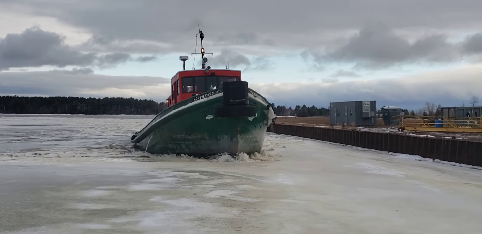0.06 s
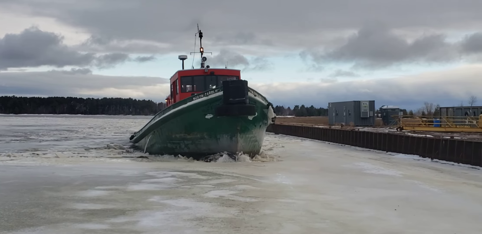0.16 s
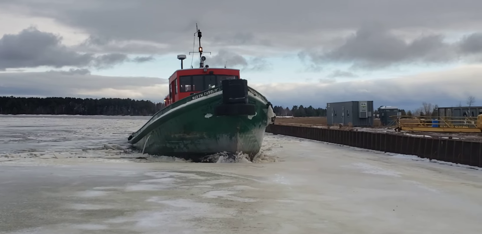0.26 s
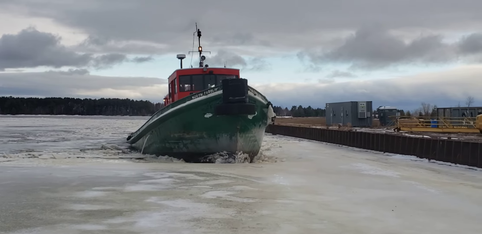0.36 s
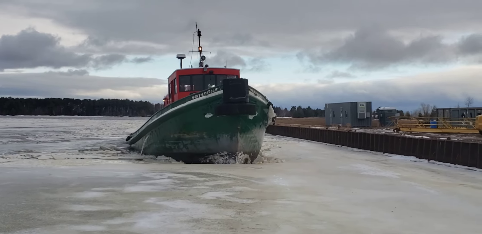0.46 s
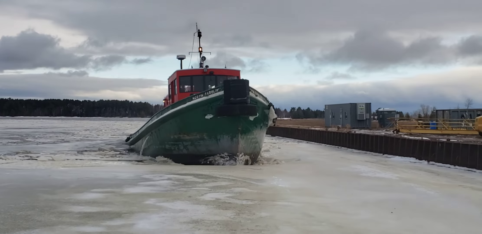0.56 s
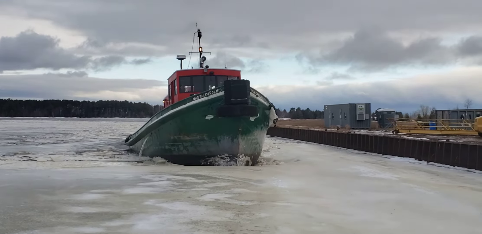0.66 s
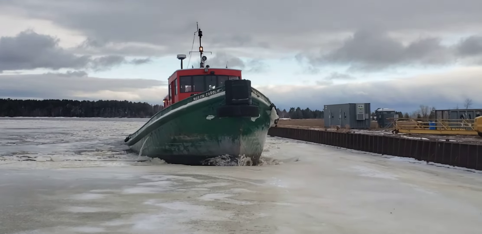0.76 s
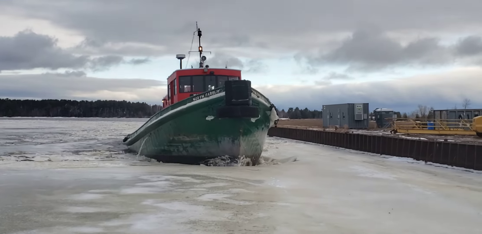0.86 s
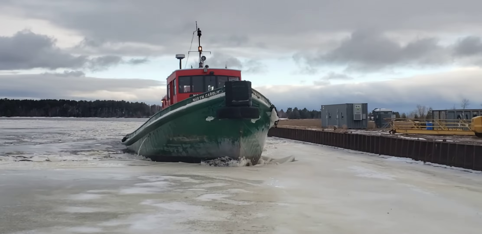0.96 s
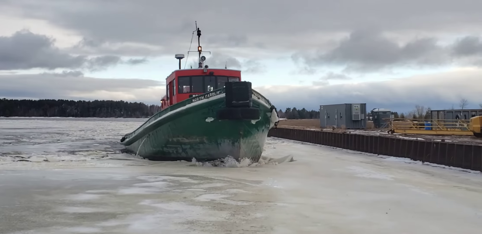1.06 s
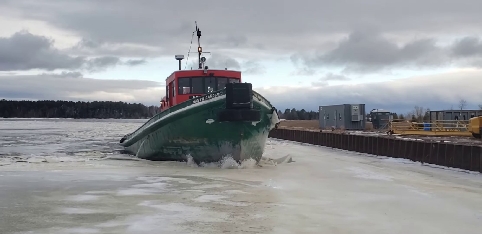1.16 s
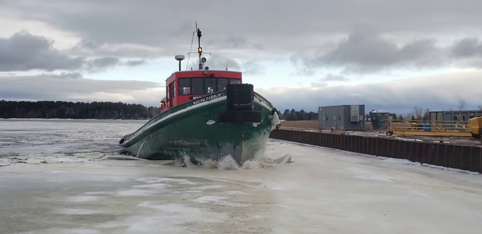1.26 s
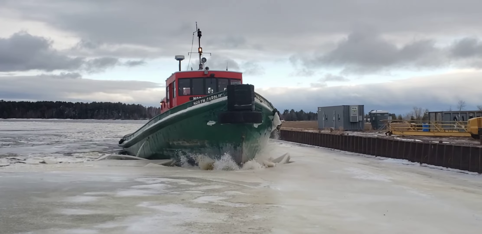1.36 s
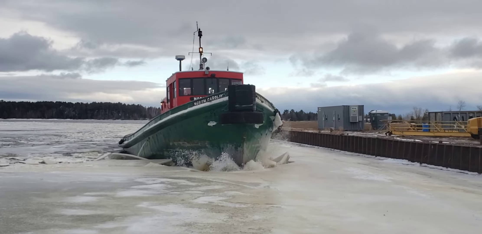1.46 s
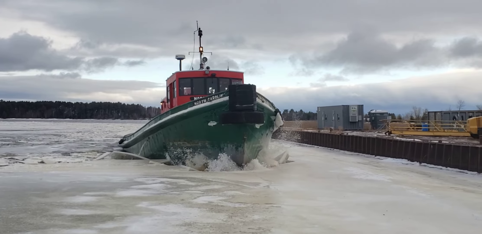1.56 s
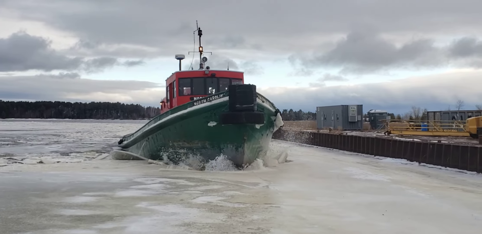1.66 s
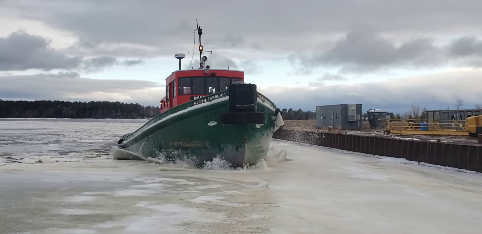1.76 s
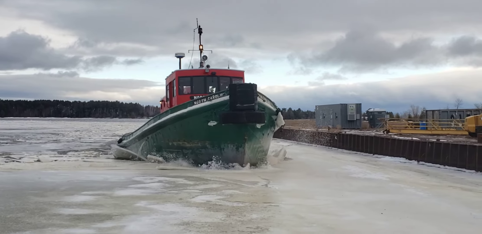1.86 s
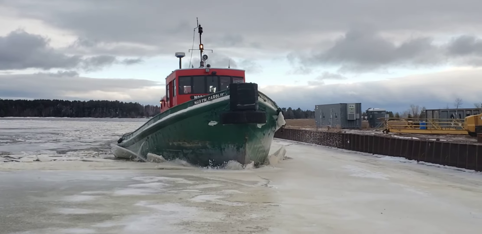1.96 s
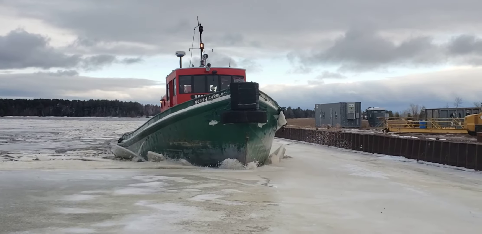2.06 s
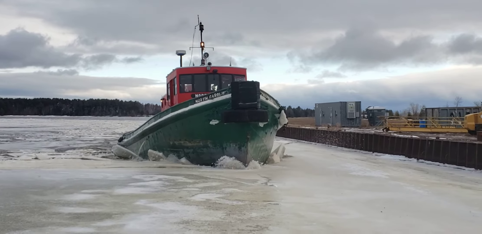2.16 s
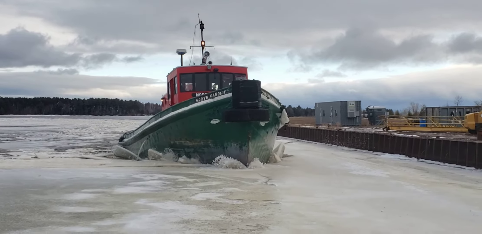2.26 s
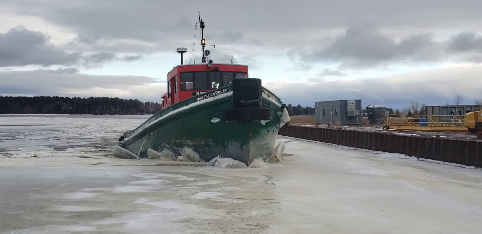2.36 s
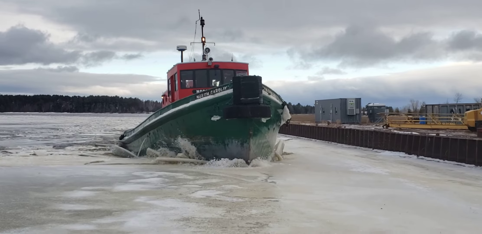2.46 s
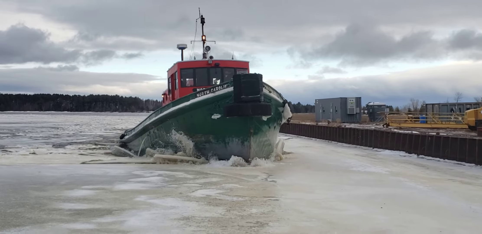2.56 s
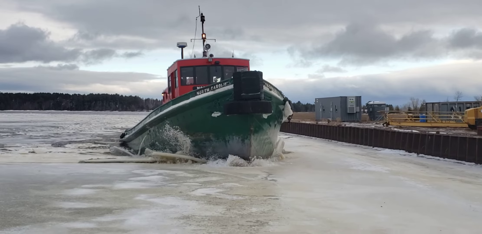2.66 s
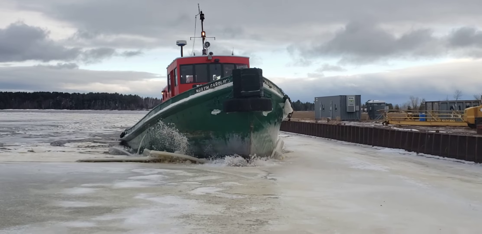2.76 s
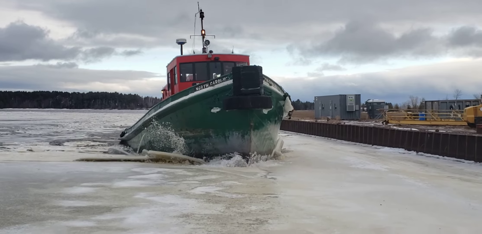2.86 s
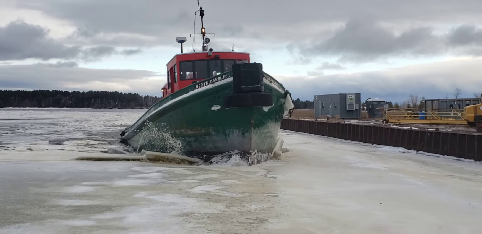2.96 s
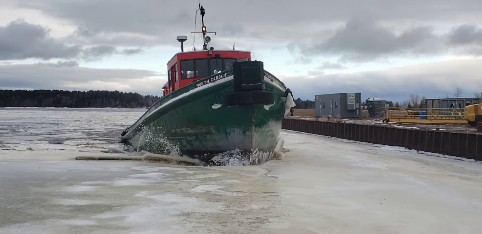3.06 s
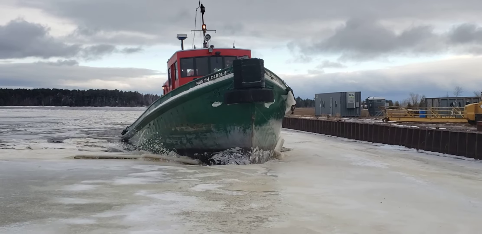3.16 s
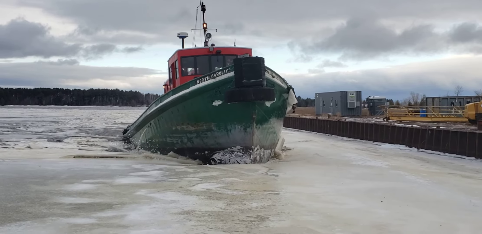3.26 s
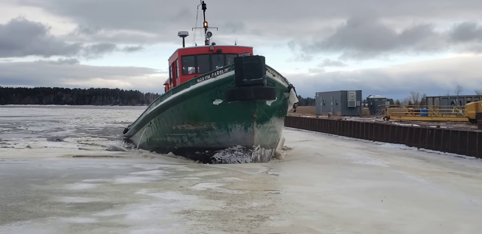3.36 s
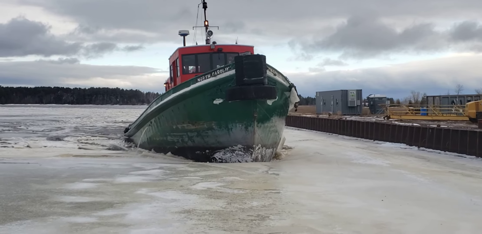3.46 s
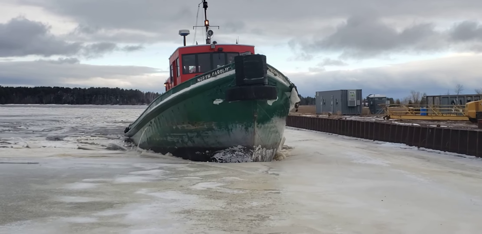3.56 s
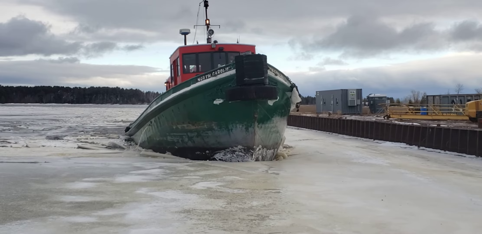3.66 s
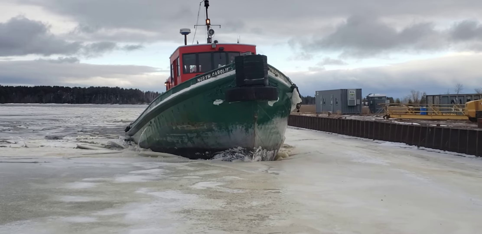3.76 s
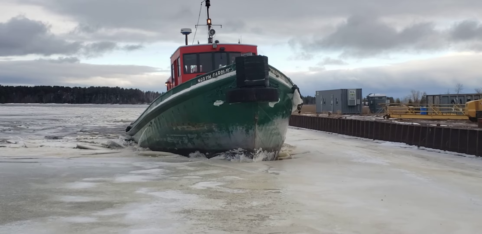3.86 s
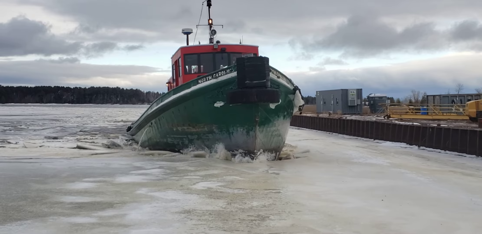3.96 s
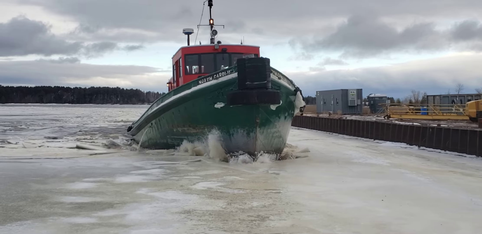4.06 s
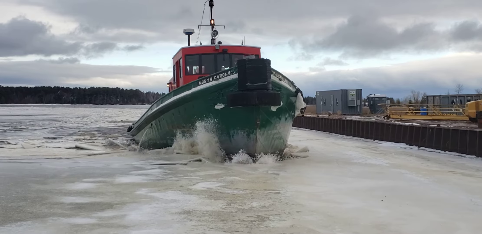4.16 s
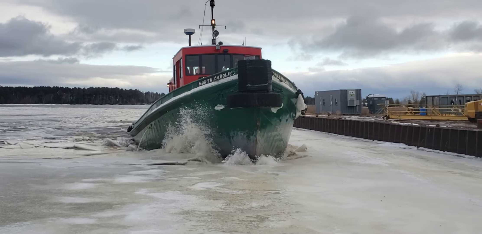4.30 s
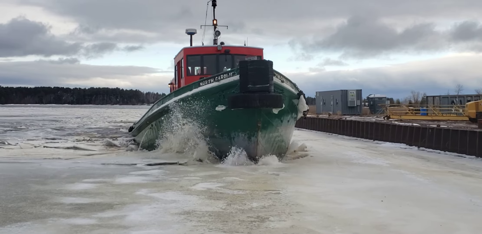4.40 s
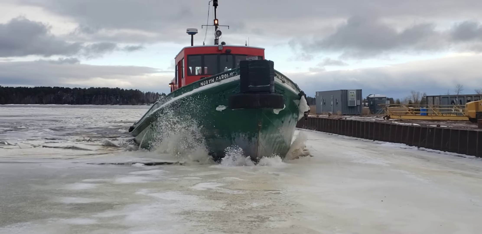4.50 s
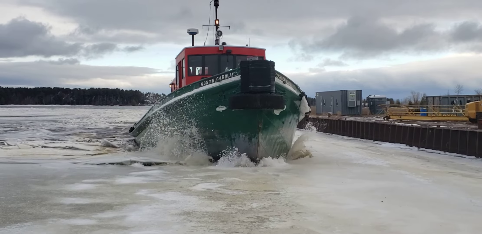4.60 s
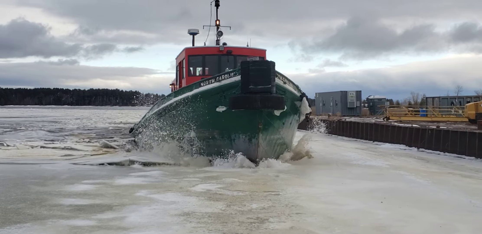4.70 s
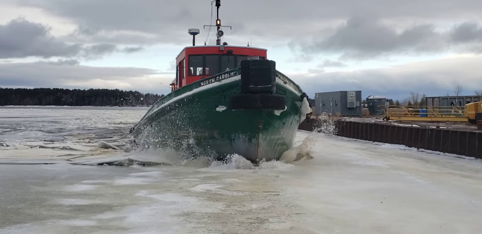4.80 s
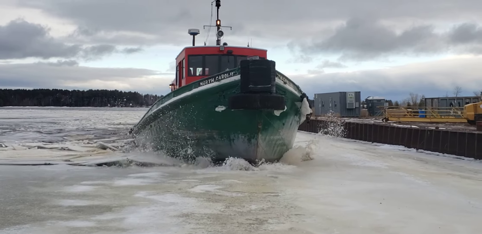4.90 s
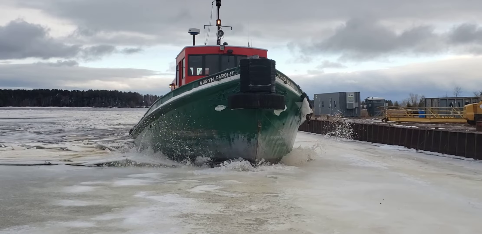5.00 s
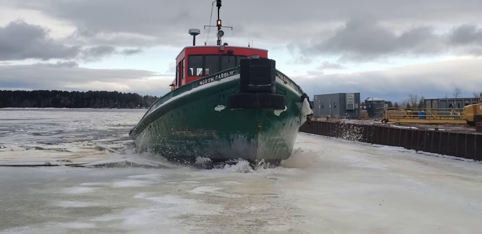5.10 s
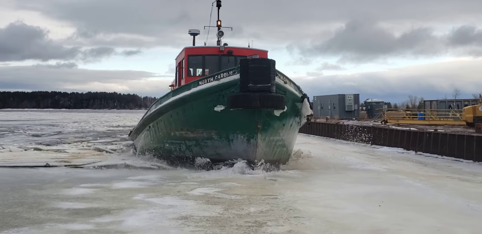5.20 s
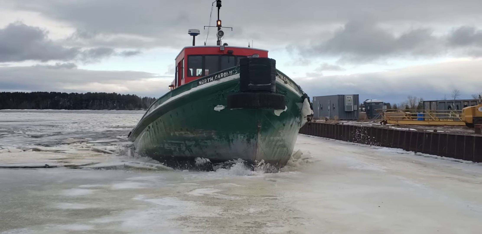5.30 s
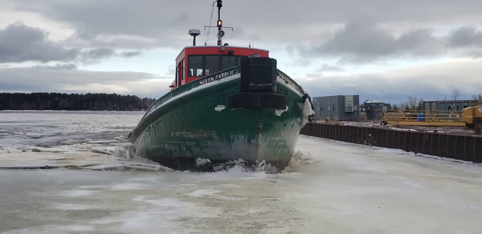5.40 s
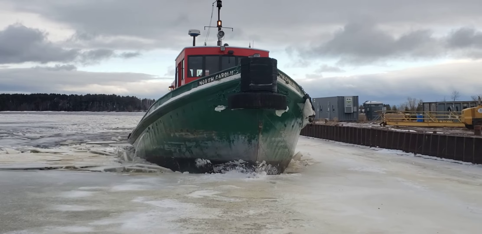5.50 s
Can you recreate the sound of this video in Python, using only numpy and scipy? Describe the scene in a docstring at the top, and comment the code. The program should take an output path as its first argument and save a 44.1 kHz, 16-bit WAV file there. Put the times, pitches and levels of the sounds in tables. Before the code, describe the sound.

A tugboat works through thin harbour ice, heard from shore in wide stereo, with light wind rumbling on the microphone and a dull echo from quay and far shore. A low diesel hum of about 70 hertz runs throughout, with dull chugs around eleven per second. It starts mid-surge: low crushing, hull rumble and a short floe groan, sinking by 0.5 s. Small bright snaps tick until about 1.2 s, when a strong surge hits with hard crunches, grinding and groans. Another from 2.0 to 2.7 s adds heavy low thumps, then big gulps of air at 2.75 and 2.9 s. Around 3.3 s ice eases; chugs stand out, a plate slides with a crackling rasp, and spray hisses briefly at 3.6 s. Crushing rebuilds from 3.9 s, strong at 4.2 to 4.8 s with groans, thumps and a gurgle. The last surge, 5.05 to 5.5 s, has sharp crunches, bright snaps and tinkling crumbs.

```python
"""A tugboat pushes through thin harbour ice, heard from the shore.
It opens in mid-surge: the bow crushes and grinds ice made of random clicks with short, hard peaks, the hull rumbles,
air gurgles, slush and spray fizz, floes groan as ringing slips, a diesel of sines and noise hums in a breeze.
Low thumps are decaying swings; from half a second bright bursts snap and crumbs tick, and surges come with crunches.
Around 3.3 s the ice eases, the diesel chugs stand out and plates slide; two more surges close the scene."""
import sys
import numpy as np
from scipy import signal
from scipy.fft import rfft, irfft, next_fast_len
from scipy.io import wavfile

SR = 44100
rng = np.random.default_rng(int(sys.argv[2]) if len(sys.argv) > 2 else 0)


def put_to_file(sound):
    """Save the sound as 16-bit audio at rate SR, in the file named by the first command-line argument."""
    columns = np.atleast_2d(sound).T  # one column per channel
    safe = np.clip(columns, -1, 1)
    whole_steps = np.round(safe * 32767)
    wavfile.write(sys.argv[1], SR, whole_steps.astype(np.int16))


N = 244314   # length in samples


def from_db(db):
    """Decibels to gain."""
    return 10 ** (np.asarray(db) / 20)


def rms_one(x):
    """Scale to rms 1."""
    return x / np.sqrt(np.mean(x ** 2) + 1e-20)


def together(levels_db):
    """Level in dB of unrelated sounds heard at once: their powers add."""
    return 10 * np.log10(sum(from_db(db) ** 2 for db in levels_db))


def in_time(rows):
    """Each column of a curve, sample by sample."""
    s, *columns = np.transpose(rows)
    return [np.interp(np.arange(N) / SR, s, column) for column in columns]


def per_bin(points):
    """A table over log frequency, read at every spectrum bin."""
    hz, value = np.transpose(points)
    bin_hz = np.fft.rfftfreq(next_fast_len(N), 1 / SR)
    return np.interp(np.log(bin_hz + 1), np.log(hz), value)


def drift(rate):
    """Smoothed noise of rms 1: a higher rate wavers faster."""
    step = 40   # computed at every 40th sample
    r = np.exp(-2 * np.pi * rate * step / SR)
    noise = rng.standard_normal(N // step + 2002)
    slow = signal.lfilter([1], [1, -2 * r, r * r], noise)[2000:]   # skip the filter's settling
    return np.interp(np.arange(N) / step, np.arange(len(slow)), rms_one(slow))


def swell(start, hold_s, rise_s, fall_s, edge_db, sag_db_per_s=0):
    """Level in dB of a swell that climbs to full force at start, sags while it holds, and dies away."""
    t = np.arange(N) / SR - start
    outside = np.maximum(-t, 0) / rise_s + np.maximum(t - hold_s, 0) / fall_s
    return -edge_db * outside - sag_db_per_s * np.clip(t, 0, hold_s)


LUMP_HALF_WIDTH_S = 0.053   # from the centre to 6 dB down


def lump(s):
    """Level in dB of a brief, rounded swell centred on time s."""
    return -20 * np.log10(1 + ((np.arange(N) / SR - s) / LUMP_HALF_WIDTH_S) ** 2)


def band(x, low_hz, high_hz):
    """Causal band-pass."""
    sos = signal.butter(2, [low_hz, min(high_hz, .45 * SR)], "band", fs=SR, output="sos")
    return signal.sosfilt(sos, x + 1e-18)


def resonances(x, rows):
    """A chain of peaks and notches."""
    for hz, width, db in rows:
        a, c, g = np.pi * width / SR, -2 * np.cos(2 * np.pi * hz / SR), from_db(db / 2)
        x = signal.lfilter([1 + a * g, c, 1 - a * g], [1 + a / g, c, 1 - a / g], x)
    return x


def pan(left_db):
    """Gains of the two channels; left_db is how much louder the left is."""
    return from_db(np.array([[left_db], [-left_db]]) / 2)


def add(out, s, sound):
    """Mix a short sound in at time s."""
    at = int(np.clip(round(s * SR), 0, N - 1))
    out[..., at:at + sound.shape[-1]] += sound[..., :N - at]


def thud(t, hz, rise_cycles):
    """A soft blow: a swing that builds for part of a cycle and dies within a few."""
    age = t * hz / rise_cycles
    return age * np.exp(1 - age) * np.sin(2 * np.pi * hz * t)


def grains(per_s, spread_db):
    """Two unrelated trains of random clicks: many small, a few large."""
    born = rng.random((2, N)) < per_s / SR
    count, clicks = born.sum(), np.zeros((2, N))
    size_db = spread_db * np.minimum(rng.exponential(1, count), 4)
    clicks[born] = from_db(size_db) * rng.choice([-1, 1], count)
    return clicks / np.sqrt(per_s)


def fractures(low_hz, high_hz, per_s, patchy_db, count):
    """Pieces of each size break in clumps of their own, so the pitch of the crunch keeps shifting."""
    edges = np.geomspace(low_hz, high_hz, count + 1)
    trains = [grains(per_s, spread_db=1.5), grains(per_s, spread_db=2.0)]
    total = 0
    for k in range(count):
        pieces = band(trains[k % 2], edges[k], edges[k + 1])
        total = total + pieces * from_db(patchy_db * drift(22.6))
    return total


# How alike left and right are. Each row: frequency in Hz, correlation.
STEREO_LIKENESS = [(50, 0.66), (130, 0.97), (280, 0.94), (550, 0.96), (1100, 0.87), (2000, 0.97),
                   (4000, 0.69), (8000, 0.14), (16000, .1)]


def radiate(pair, spectrum):
    """Colour two excitations and mix them to stereo, mostly alike up to the mids and wide on top; rms 1."""
    size = next_fast_len(N)
    mid, side = rfft(pair, size) * from_db(per_bin(spectrum))
    alike = np.clip(per_bin(STEREO_LIKENESS), -.99, .99)
    mid, side = mid * np.sqrt(1 + alike), side * np.sqrt(1 - alike)
    return rms_one(irfft([mid + side, mid - side], size)[:, :N])


# The diesel's course. Each row: time in seconds, hum in dB, exhaust rumble in dB.
ENGINE_LEVELS = [(0, -45, -46), (0.5, -49, -52), (1.1, -42.5, -62), (1.35, -42, -48), (1.9, -40, -43),
                 (2.5, -37, -44), (3.15, -48, -48), (3.7, -41, -47), (4.5, -37, -39), (5.54, -35, -43)]
# Harmonics of the firing rate. Each row: multiple, relative level in dB.
FIRING_HARMONICS = [(1, -2), (2, -12), (3, -32), (4, -41)]
# Colour of the exhaust rumble. Each row: frequency in Hz, relative dB per Hz.
EXHAUST_SPECTRUM = [(12, -30), (30, -9), (48, -1), (65, 2.5), (90, 1), (140, -14), (300, -36.5)]
FIRING_HZ, CYLINDERS, FIRST_CHUG_S = 69.28, 6, 0.035
HUM_WAVER_DB, HUM_WAVER_RATE = 1.0, 2.0


def diesel():
    """Wavering firing harmonics over noisy exhaust rumble, with a chug on every sixth firing."""
    hum_db, exhaust_db = in_time(ENGINE_LEVELS)
    turn = 2 * np.pi * FIRING_HZ * (np.arange(N) / SR - FIRST_CHUG_S)
    hum = 0
    for multiple, db in FIRING_HARMONICS:
        waver_db = HUM_WAVER_DB * drift(HUM_WAVER_RATE)
        hum = hum + from_db(db + waver_db) * np.sin(multiple * turn)
    hum = rms_one(hum) * pan(left_db=-2.5)
    exhaust = radiate(rng.standard_normal((2, N)), EXHAUST_SPECTRUM) * from_db(exhaust_db)
    return from_db(hum_db) * hum + exhaust + chugs(uneven_db=1.5, pitch_spread=0.15)


# The bow rides into the sheet. Each row: full force at in seconds, hold in seconds, rise in seconds,
# fall in seconds, crushing in dB, grinding in dB, hull rumble in dB.
BOW_SURGES = [(-0.08, 0.2, 0.15, 0.36, -25, -33.5, -26), (0.5, 0.32, 0.13, 0.23, -38.5, -45.5, -41),
              (1.241, 0.42, 0.34, 0.18, -21.5, -30.5, -24.5), (2.045, 0.69, 0.13, 0.53, -23, -31.5, -26),
              (4.162, 0.65, 0.32, 0.25, -22, -31.5, -24.5), (5.052, 0.58, 0.22, 0.3, -24, -32.5, -27.5)]
# Single slabs buckle under the bow. Each row: time in seconds, crushing in dB.
SLAB_BUCKLES = [(0.68, -34.5), (1.27, -24.5), (1.42, -28), (1.54, -33), (2.24, -34), (2.51, -22.5),
                (2.78, -25.5), (2.96, -29.5), (3.48, -36), (3.86, -37), (4.02, -43), (4.39, -23),
                (4.53, -27), (5.29, -26), (5.52, -28)]
# Sharp edges scrape along the bow. Each row: time in seconds, grinding in dB.
EDGE_SCRAPES = [(1.27, -37), (1.39, -34), (2.06, -45), (3.85, -39), (3.98, -38), (4.16, -30), (4.3, -29.5),
                (4.42, -34), (4.6, -33.5), (4.72, -42)]
SURGE_EDGE_DB, SAG_DB_PER_S = 14, 2   # change over one rise or fall time; how fast a held surge tires
GRIND_LEAD_S = 0.022   # the edges grind just before the slabs give way
HULL_LAG_S, HULL_RISE_S, HULL_FALL_S = 0.053, 0.35, 0.4   # the hull answers late and slowly
IDLE_CRUSH_DB, IDLE_GRIND_DB, IDLE_RUMBLE_DB = -42, -55.5, -45   # loose ice between surges
BUCKLE_GRIND_DB, BUCKLE_RUMBLE_DB = -11.5, -7   # relative to a buckle's crushing


def bow():
    """Levels of crushing, grinding and hull rumble: surges, plus lumps from buckling and scraping."""
    crush, grind, rumble = [IDLE_CRUSH_DB], [IDLE_GRIND_DB], [IDLE_RUMBLE_DB]
    for s, hold_s, rise_s, fall_s, crush_db, grind_db, rumble_db in BOW_SURGES:
        crush.append(crush_db + swell(s, hold_s, rise_s, fall_s, SURGE_EDGE_DB, SAG_DB_PER_S))
        grind.append(grind_db + swell(s - GRIND_LEAD_S, hold_s, rise_s, fall_s, SURGE_EDGE_DB, SAG_DB_PER_S))
        hull_hold_s = max(hold_s - HULL_LAG_S, 0)
        rumble.append(rumble_db + swell(s + HULL_LAG_S, hull_hold_s, HULL_RISE_S, HULL_FALL_S, SURGE_EDGE_DB))
    for s, db in SLAB_BUCKLES:
        crush.append(db + lump(s))
        grind.append(db + BUCKLE_GRIND_DB + lump(s))
        rumble.append(db + BUCKLE_RUMBLE_DB + lump(s + HULL_LAG_S))
    grind += [db + lump(s) for s, db in EDGE_SCRAPES]
    return together(crush), together(grind), together(rumble)


# Colour of slabs giving way. Each row: frequency in Hz, relative dB per Hz.
CRUSH_SPECTRUM = [(40, -45), (120, -31), (250, -13.5), (330, 3), (450, 2), (620, 0.5), (740, -5),
                  (900, -15.5), (1300, -36), (3000, -66)]
# Colour of grinding edges. Each row: frequency in Hz, relative dB per Hz.
GRIND_SPECTRUM = [(450, -31), (740, 0), (860, 1.5), (1150, 1.5), (1500, -4.5), (1900, -10), (2600, -20),
                  (4000, -25.5), (8000, -50)]


def crushing(crush_db, grind_db):
    """Thick slabs give way with a low crunch; their edges grind along the bow about an octave higher."""
    slabs = radiate(fractures(161.0, 1333, per_s=2200, patchy_db=1.5, count=11), CRUSH_SPECTRUM)
    edges = radiate(fractures(482.0, 4484, per_s=3000, patchy_db=1.5, count=14), GRIND_SPECTRUM)
    slabs = from_db(crush_db) * slabs * pan(left_db=-0.7)
    edges = from_db(grind_db) * edges * pan(left_db=-1.0)
    return slabs + edges


# Colour of the knocks on the hull. Each row: frequency in Hz, relative dB per Hz.
RUMBLE_SPECTRUM = [(15, -50), (45, -20), (80, -4), (125, 1), (165, -0.5), (200, -0.5), (250, 0), (330, -6),
                   (600, -19.5), (1500, -51.5)]
# The hull booms. Each row: frequency in Hz, width in Hz, boost or cut in dB.
HULL_BOOMS = [(130, 9.4, -2.5), (192.8, 5.6, 7.5), (210, 9.4, 6)]


def hull(rumble_db):
    """Floes and churned water knock on the steel hull, which booms at its own pitches."""
    knocks = radiate(grains(per_s=700, spread_db=3.0), RUMBLE_SPECTRUM)
    return from_db(rumble_db) * rms_one(resonances(knocks, HULL_BOOMS)) * pan(left_db=-0.6)


def bubble(hz, cycles, rise):
    """A pocket of air swells, rings for some cycles and rises in pitch as it nears the surface."""
    length = int(7 * cycles / hz * SR)
    age = np.arange(length) / SR * hz / cycles   # 1 at the loudest moment
    return age * np.exp(1 - age) * np.sin(2 * np.pi * cycles * (age + rise * age ** 2 / 2))


# Big gulps of air in the bow wave. Each row: start in seconds, peak in dB, starting pitch in Hz,
# cycles to the peak, share by which the pitch has risen by then.
AIR_GULPS = [(2.747, -23, 186.5, 3.35, 0.097), (2.903, -23.5, 148, 4.8, 0.65),
             (4.556, -22.5, 169.7, 3.3, 0.15)]


def gurgle(crush_db, count):
    """A few big gulps, and many smaller bubbles as strong as the crushing at that moment."""
    out = np.zeros(N)
    for s, peak_db, hz, cycles, rise in AIR_GULPS:
        add(out, s, from_db(peak_db) * bubble(hz, cycles, rise))
    for when, height, weakness in rng.random((count, 3)):
        # higher bubbles are quieter
        gain = from_db(crush_db[int(when * N)] - 12.0 * height - 5.2 * weakness)
        add(out, when * N / SR, gain * bubble(260 * 4.74 ** height, cycles=2.6, rise=0.04))
    return out * pan(left_db=1.5)


# The steady bow wave. Each row: time in seconds, slush in dB, fine spray in dB.
BOW_WAVE_LEVELS = [(0, -43, -51), (0.8, -45.5, -55), (1.6, -42.5, -50.5), (2.9, -43, -46.5),
                   (3.3, -42.5, -48.5), (3.75, -42.5, -50.5), (4.4, -41.5, -46), (5.54, -45.5, -47.5)]
# Water thrown aside falls on the ice. Each row: full force at in seconds, rise in seconds, hold in seconds,
# fall in seconds, slush in dB, fine spray in dB.
WATER_SPLASHES = [(0.0, 0.1, 0.28, 0.16, -44, -51.5), (0.92, 0.02, 0.17, 0.16, -43.5, -55),
                  (1.18, 0.15, 0.2, 0.13, -38.5, -45), (1.59, 0.08, 0.18, 0.14, -44, -56),
                  (1.865, 0.08, 0.14, 0.16, -42, -46), (2.023, 0.14, 0.46, 0.13, -42.5, -49.5),
                  (3.413, 0.11, 0.11, 0.047, -40.5, -42.5), (3.613, 0.03, 0.038, 0.031, -43.5, -48),
                  (3.963, 0.022, 0.11, 0.16, -38.5, -44.5), (4.205, 0.12, 0.12, 0.16, -39, -55),
                  (4.812, 0.12, 0.26, 0.17, -41.5, -45), (5.075, 0.14, 0.42, 0.16, -38.5, -42.5)]
# Colour of the slush. Each row: frequency in Hz, relative dB per Hz.
SLUSH_SPECTRUM = [(400, -11), (1000, 0), (1800, 5.5), (3100, -1), (4200, -5), (5300, -17), (7000, -18.5),
                  (10000, -17), (16000, -38)]
# Colour of the fine spray. Each row: frequency in Hz, relative dB per Hz.
SPRAY_SPECTRUM = [(2500, -26), (5000, -5.5), (6600, -4), (8000, -7.5), (9300, -8.5), (10400, 0), (11200, 2),
                  (11900, 5), (13000, -3.5), (13800, -2.5), (15200, 0.5), (16000, 2.5)]


def wash():
    """Slush rattles along the bow wave; with each splash, drops and crumbs patter on the ice."""
    slush_db, spray_db = ([steady_db] for steady_db in in_time(BOW_WAVE_LEVELS))
    for s, rise_s, hold_s, fall_s, heavy_db, fine_db in WATER_SPLASHES:
        shape_db = swell(s, hold_s, rise_s, fall_s, edge_db=9.5)
        slush_db.append(heavy_db + shape_db)
        spray_db.append(fine_db + shape_db)
    slush = radiate(fractures(487, 8800, per_s=2200, patchy_db=1.5, count=14), SLUSH_SPECTRUM)
    spray = radiate(fractures(3350, 18260, per_s=4500, patchy_db=2.0, count=12), SPRAY_SPECTRUM)
    slush = slush * from_db(together(slush_db) + 0.5 * drift(28))
    spray = spray * from_db(together(spray_db) + 0.27 * drift(22))
    return slush * pan(left_db=-0.5) + spray * pan(left_db=1.1)


# Colour of the wind. Each row: frequency in Hz, relative dB per Hz.
BREEZE_SPECTRUM = [(8, -40), (18, -20), (30, -13), (52, 7), (80, 1), (130, 2), (250, -4), (450, -4),
                   (800, -32), (2000, -30), (6000, -58)]
# Puffs of wind on the microphone. Each row: centre in seconds, level in dB.
WIND_PUFFS = [(0.84, -32.5), (2.8, -30), (3.03, -30), (3.5, -29.5), (4.47, -33), (4.97, -35), (5.38, -30)]


def breeze(level_db):
    """Light wind rumbles softly, different at each microphone port, with a few stronger puffs."""
    size = next_fast_len(N)
    noise = rng.standard_normal((2, size))
    air = irfft(rfft(noise) * from_db(per_bin(BREEZE_SPECTRUM)), size)[:, :N]
    wind_db = together([level_db] + [db + lump(s) for s, db in WIND_PUFFS])
    return rms_one(air) * from_db(wind_db + 0.8 * np.array([drift(3.3), drift(6.2)]))


# Thick floes groan along the bow. Each row: start in seconds, length in seconds, starting pitch in Hz,
# final pitch in Hz, level in dB.
FLOE_GROANS = [(0.0, 0.12, 473, 424, -22.5), (0.15, 0.19, 300, 205, -30.5), (0.16, 0.12, 443, 387, -29),
               (1.31, 0.13, 202, 230, -26), (1.42, 0.19, 540, 427, -30), (1.55, 0.16, 192, 203, -27),
               (2.0, 0.13, 502, 500, -29), (2.18, 0.065, 420, 473, -21), (2.27, 0.21, 204, 198, -25.5),
               (2.46, 0.23, 133, 126, -27.5), (2.48, 0.057, 506, 494, -31), (3.8, 0.16, 165, 199, -37),
               (4.0, 0.11, 200, 150, -27), (4.09, 0.17, 193, 198, -28), (4.26, 0.1, 195, 195, -25),
               (4.35, 0.31, 534, 510, -26.5), (4.4, 0.12, 227, 208, -24.5), (4.68, 0.099, 193, 216, -27),
               (4.81, 0.1, 282, 338, -26.5), (5.34, 0.2, 172, 173, -29)]
GROAN_WIDTH, SLIPS_PER_S = 0.29, 1500   # bandwidth as a share of the starting pitch; how often the floe slips


def groans():
    """A thick floe sticks and slips on the plating; the slips ring at a pitch that follows the contact."""
    out, t = np.zeros(N), np.arange(SR // 2) / SR
    for s, length_s, start_hz, end_hz, db in FLOE_GROANS:
        slips = rng.standard_normal(len(t)) * (rng.random(len(t)) < SLIPS_PER_S / SR)
        pitch_hz = np.interp(t, [0, length_s], [start_hz, end_hz])
        turn = np.exp(2j * np.pi * np.cumsum(pitch_hz) / SR)
        r = np.exp(-np.pi * GROAN_WIDTH * start_hz / SR)
        press = np.sqrt(np.maximum(np.sin(np.pi * np.minimum(t / length_s, 1)), 0))
        # a low-pass in the frame of the gliding pitch acts as a gliding resonance
        ring = (signal.lfilter([1], [1, -2 * r, r * r], slips / turn) * turn).real * press
        add(out, s, from_db(db) * rms_one(ring) * np.sqrt(np.mean(press ** 2)))
    return out * pan(left_db=1.0)


# Loud grains of the crunch. Each row: start in seconds, peak in dB, top of the grain's band in Hz.
CRUNCH_PEAKS = [(0.031, -23, 1510), (0.405, -29, 1200), (1.222, -19, 1090), (1.266, -14, 1500),
                (1.338, -15.5, 1190), (1.655, -18, 1200), (2.067, -20, 900), (2.121, -15, 1100),
                (2.202, -20, 1300), (2.231, -17, 900), (2.508, -22, 1400), (2.541, -15, 1200),
                (2.702, -30, 1100), (2.78, -18, 900), (2.843, -31, 1300), (3.959, -20, 2470),
                (4.388, -15, 1000), (4.757, -18, 900), (5.232, -18, 1180), (5.274, -21.5, 1200),
                (5.287, -12.5, 980), (5.341, -12, 1100), (5.367, -16, 1400), (5.503, -14, 1190)]
PEAK_LOW_HZ = 500   # bottom of every grain's band


def crunch_peaks(decay_s, noise_share):
    """Short, hard peaks in the crushing: a band-passed click with a quickly dying burst of noise."""
    out, t = np.zeros(N), np.arange(SR // 15) / SR
    for s, peak_db, top_hz in CRUNCH_PEAKS:
        noise = rng.standard_normal(len(t)) * np.exp(-t / decay_s)
        click = (t == 0) + noise_share * noise
        grain = band(click, PEAK_LOW_HZ, top_hz)
        add(out, s, from_db(peak_db) * grain / np.abs(grain).max())
    return out


# Strength of the hard-firing cylinder's puff, ahead of the pipe. Each row: time in seconds, level in dB.
CHUG_STRENGTH = [(0, -36), (0.55, -42), (1.2, -33), (2.0, -27), (2.72, -24), (2.81, -20), (2.89, -32),
                 (3.24, -21), (3.33, -14.5), (3.41, -19.5), (3.5, -24.5), (3.67, -31), (3.85, -26),
                 (4.5, -27), (4.8, -25), (5.54, -27)]
# The exhaust pipe rings with each puff. Each row: central pitch in Hz, level in dB, cycles to the peak.
PIPE_RINGS = [(68, -5.5, 0.53), (173, -9, 0.78)]


def chugs(uneven_db, pitch_spread):
    """Once in each engine cycle the hard-firing cylinder sends a dull puff through the exhaust pipe."""
    out, t = np.zeros(N), np.arange(SR // 8) / SR
    times = np.arange(FIRST_CHUG_S, N / SR, CYLINDERS / FIRING_HZ)
    for s, (strength, pitch) in zip(times, rng.standard_normal((len(times), 2))):
        puff_db = np.interp(s, *np.transpose(CHUG_STRENGTH)) + uneven_db * strength
        for hz, db, rise_cycles in PIPE_RINGS:
            ring = thud(t, hz * np.exp(pitch_spread * pitch), rise_cycles)
            add(out, s, from_db(puff_db + db) * ring)
    return out


def harbour(x, t60_s, wet_db):
    """The quay wall and the far shore send back a dull, diffuse tail after 40 ms."""
    t = np.arange(2 * SR) / SR
    echoes = rng.standard_normal((2, len(t))) * from_db(-60 * t / t60_s) * (t > .04)
    tail = band(echoes / np.linalg.norm(echoes[0]), 50, 1440)
    return from_db(wet_db) * signal.fftconvolve(x, tail, axes=1)[:, :N]


# Low thumps, some of them engine chugs. Each row: start in seconds, level in dB, pitch in Hz.
LOW_THUMPS = [(0.243, -24, 175), (0.654, -21, 162), (0.721, -25, 125), (0.777, -29, 110), (1.336, -19, 180),
              (1.71, -13.5, 171), (1.78, -17, 119), (1.837, -17.5, 125), (2.253, -19, 95),
              (2.321, -13.5, 190), (2.357, -16, 128), (2.5, -19, 95), (2.579, -13, 150), (3.050, -26, 80),
              (3.138, -27, 72), (3.329, -26, 204.5), (3.42, -24, 165), (3.908, -24, 85.4),
              (4.061, -21, 170), (4.287, -16, 190), (4.416, -21, 110), (4.424, -14, 200), (4.703, -22, 200),
              (5.354, -18, 169), (5.410, -19, 180)]


def thumps(rise_cycles):
    """Each low thump swings for a cycle or two; the lower the swing, the longer it lasts."""
    out, t = np.zeros(N), np.arange(SR // 8) / SR
    for s, level_db, hz in LOW_THUMPS:
        add(out, s, from_db(level_db) * thud(t, hz, rise_cycles))
    return out


# The finest crumbs of ice tinkle over the sheet. Each row: time in seconds, level in dB.
CRUMB_LEVELS = [(0.47, -75), (0.51, -63), (1.2, -54), (1.5, -62), (3.0, -62), (4.7, -59), (5.1, -52),
                (5.54, -48)]


def tinkle():
    """Tiny crumbs skitter over the ice, each a very high tick."""
    level_db, = in_time(CRUMB_LEVELS)
    ticks = rms_one(band(grains(per_s=900, spread_db=3.0), 12000, 14500))
    return ticks * from_db(level_db) * pan(left_db=1.0)


# Snapping shards of ice and, at 3.626 s, a short hiss of fine spray.
# Each row: start in seconds, level in dB, relative level of the mid-high body in dB.
BRIGHT_BURSTS = [(0.5114, -40, -14), (0.5661, -40, -14), (0.6913, -41, -13), (0.7452, -42, -14),
                 (0.8061, -37, -11), (0.8355, -39, -9), (0.9502, -37, -12), (1.036, -32, -10),
                 (1.0664, -38, -12), (1.121, -34, 2), (1.1677, -32, -3), (1.5409, -30, -10),
                 (1.5504, -35, -10), (1.8123, -35, -12), (1.8347, -32, -12), (2.5104, -32, -8),
                 (3.269, -38, -2), (3.626, -31, -6), (3.7788, -34, -8), (3.9576, -36, 3),
                 (5.0243, -33, -12), (5.2648, -33, -10), (5.4434, -32, -10), (5.4982, -29, -7)]


def bright_bursts(decay_s):
    """A few milliseconds of bright, dying noise make the snap of a shard or a short hiss of spray."""
    out, t = np.zeros((2, N)), np.arange(SR // 20) / SR
    for s, level_db, body_db in BRIGHT_BURSTS:
        noise = rng.standard_normal((2, len(t))) * np.exp(-t / decay_s)
        burst = band(noise, 10400, 16500) + from_db(body_db) * band(noise, 2200, 7800)
        add(out, s, from_db(level_db) * burst)
    return out


# Brittle plates crumbling. Each row: start in seconds, level in dB, centre of the band in Hz.
PLATE_CRUNCHES = [(0.912, -47, 2900), (0.97, -51, 3500), (1.159, -36, 2250), (1.335, -43, 3280),
                  (1.383, -42, 3380), (1.568, -41.5, 3100), (1.657, -40.5, 2900), (2.16, -46, 2000),
                  (2.508, -38, 2100), (3.375, -45, 3900), (3.428, -41, 3050), (3.459, -40, 2050),
                  (3.957, -34, 2300), (4.048, -38, 2200), (4.24, -35, 1900), (4.5, -42, 2950),
                  (5.387, -32, 2100)]
CRUNCH_DECAY_S, CRUNCH_SPAN = 0.031, 1.24   # span: ratio of the band's edges to its centre


def crunches(snaps_per_s, side_share):
    """A brittle plate crumbles in a quick, dying run of tiny snaps."""
    out, t = np.zeros((2, N)), np.arange(SR // 6) / SR
    dying = np.exp(-t / CRUNCH_DECAY_S)
    for s, db, hz in PLATE_CRUNCHES:
        snaps = rng.standard_normal((2, len(t))) * (rng.random(len(t)) < snaps_per_s / SR)
        runs = band(snaps * dying, hz / CRUNCH_SPAN, hz * CRUNCH_SPAN)
        mid, side = (rms_one(run) for run in runs)
        stereo = np.array([mid + side_share * side, mid - side_share * side])
        add(out, s, from_db(db) * np.sqrt(np.mean(dying ** 2)) * stereo)
    return out


# Thin plates of ice slide over the sheet. Each row: full force at in seconds, hold in seconds, level in dB.
PLATE_SLIDES = [(2.947, 0.05, -48.5), (3.375, 0.08, -45)]
# Colour of their rasp. Each row: frequency in Hz, relative dB per Hz.
RASP_SPECTRUM = [(1500, -26), (2900, 1), (4300, 2), (5800, -9.5), (9000, -9), (12000, -10), (16000, -22)]


def slides():
    """A loose plate skates over the sheet with a wide, crackling rasp."""
    swells_db = [db + swell(s, hold_s, rise_s=0.12, fall_s=0.13, edge_db=10.0) for s, hold_s, db in PLATE_SLIDES]
    rasp = radiate(grains(per_s=2200, spread_db=3.0), RASP_SPECTRUM)
    return rasp * from_db(together(swells_db))


LEFT_DIP_S, LEFT_DIP_HOLD_S, LEFT_DIP_HZ = 3.6, 0.14, 230


def bass_dip(left):
    """The bass dips briefly on the left and comes back: a crossfade to a high-passed copy."""
    share = from_db(swell(LEFT_DIP_S, LEFT_DIP_HOLD_S, rise_s=0.05, fall_s=0.1, edge_db=14))
    thin = signal.sosfilt(signal.butter(1, LEFT_DIP_HZ, "high", fs=SR, output="sos"), left)
    return left + share * (thin - left)


CRUSH_LUMPY_DB, RUMBLE_LUMPY_DB, LUMPY_RATE = 0.5, -0.5, 26   # ice and water give way unevenly


def scene():
    """Boat, ice and water in the open air."""
    crush_db, grind_db, rumble_db = bow()
    uneven_db = CRUSH_LUMPY_DB * drift(LUMPY_RATE)
    ice = crushing(crush_db + uneven_db, grind_db + uneven_db)
    ice = ice + groans() + crunch_peaks(decay_s=0.0031, noise_share=0.1)
    ice = ice + tinkle() + crunches(snaps_per_s=1100, side_share=0.15) + slides()
    water = gurgle(crush_db, count=260) + wash()
    boat = diesel() + hull(rumble_db + RUMBLE_LUMPY_DB * drift(LUMPY_RATE))
    near = boat + ice + water + thumps(rise_cycles=0.39) + bright_bursts(decay_s=0.0046)
    return near + harbour(near, t60_s=1.8, wet_db=-16.0) + breeze(level_db=-39.0)


# Colour of the centre of the image. Each row: frequency in Hz, width in Hz, boost or cut in dB.
CENTRE_COLOUR = [(379.3, 89, -7), (429, 11.6, 2.5), (1551, 223, -7.5), (1834, 180, 1.5), (2150, 424, -9),
                 (2653, 200, -9.5), (2995, 130, 3), (4320, 1250, -2.5), (5080, 500, 4), (5990, 450, -8),
                 (6700, 400, 2), (7260, 450, -2.5), (7860, 500, 2.5)]
LOW_CUT_HZ, CUTOFF_HZ = 22, 15770


def record(dry):
    """The microphone colours the centre of the image; the deepest bass and the top are cut."""
    dry = signal.sosfilt(signal.butter(2, LOW_CUT_HZ, "high", fs=SR, output="sos"), dry)
    mid = resonances(dry.mean(axis=0), CENTRE_COLOUR)
    side = (dry[0] - dry[1]) / 2
    top = signal.ellip(12, .1, 80, CUTOFF_HZ, fs=SR, output="sos")
    return signal.sosfilt(top, np.array([bass_dip(mid + side), mid - side]))


dry = scene()
out = record(dry)
put_to_file(out)
```